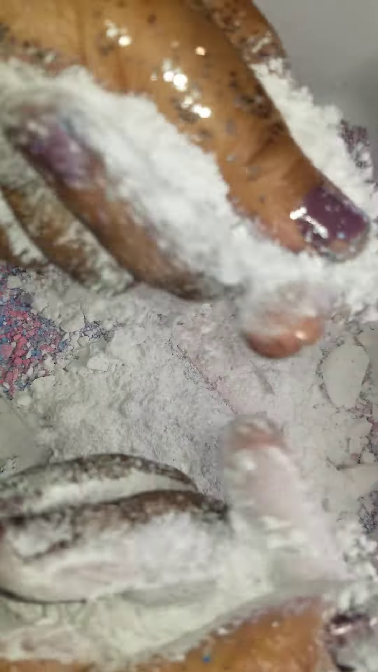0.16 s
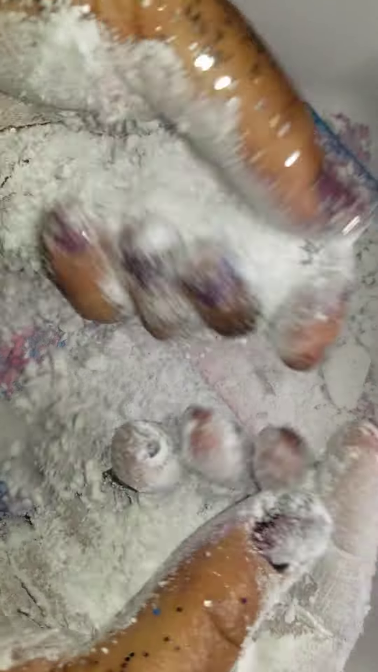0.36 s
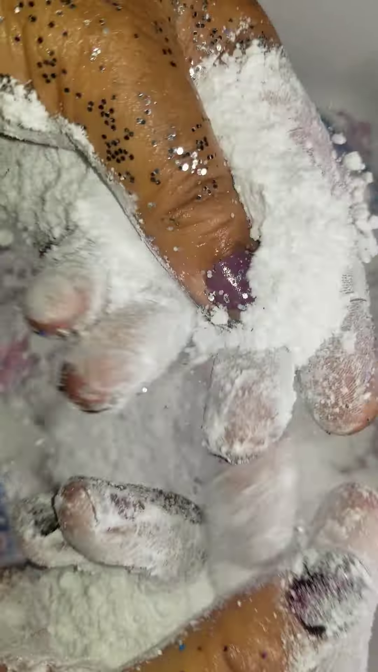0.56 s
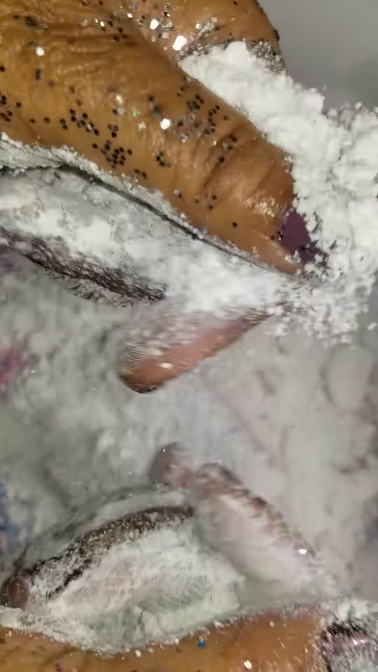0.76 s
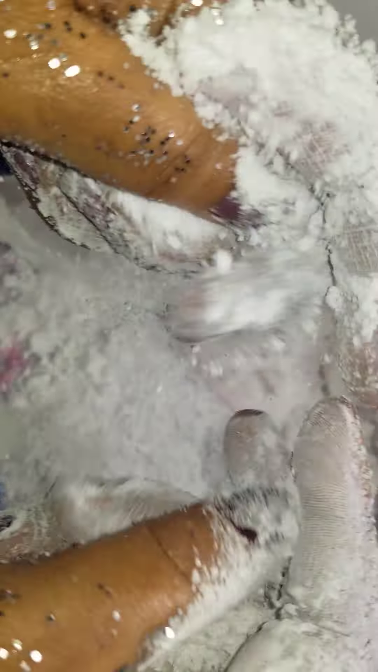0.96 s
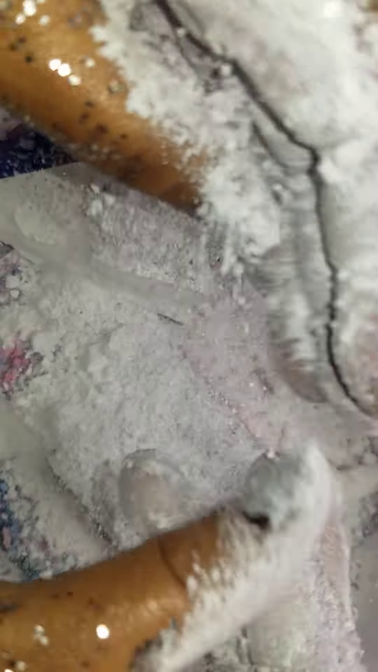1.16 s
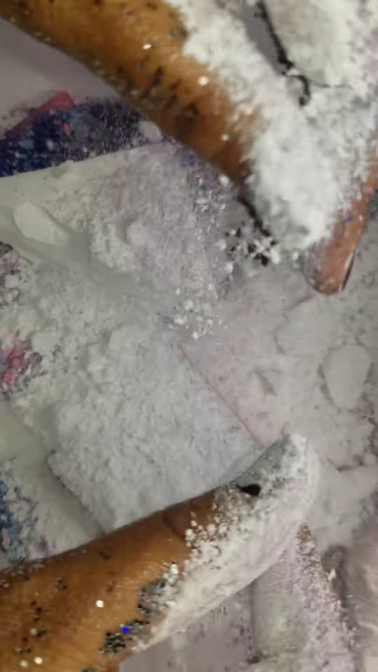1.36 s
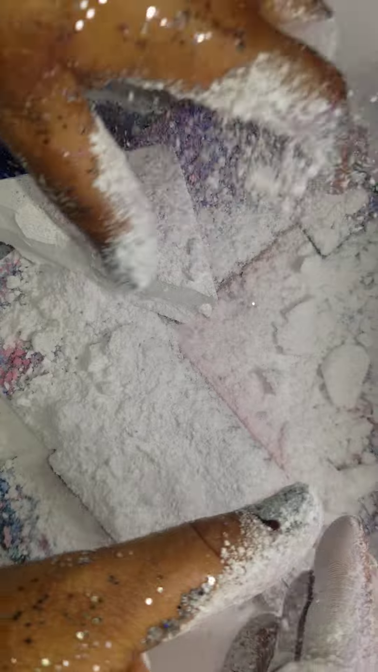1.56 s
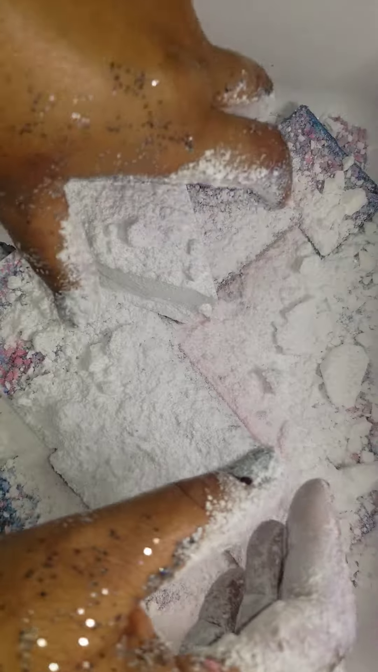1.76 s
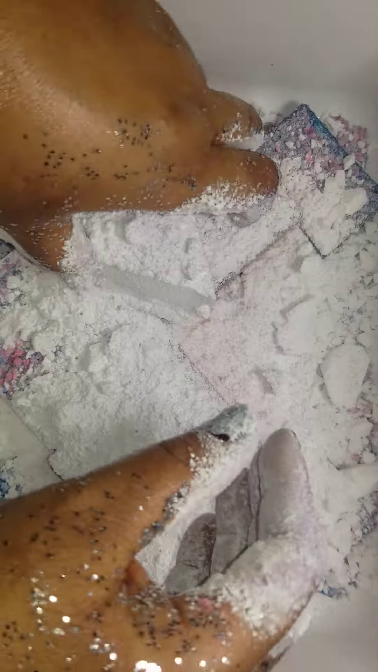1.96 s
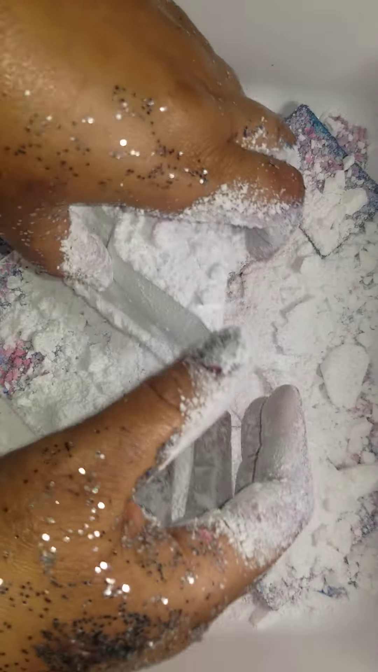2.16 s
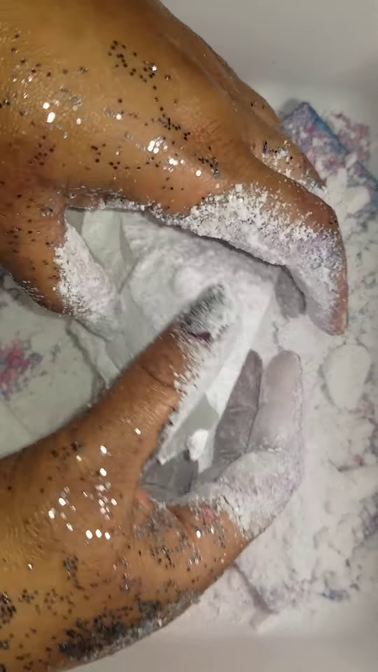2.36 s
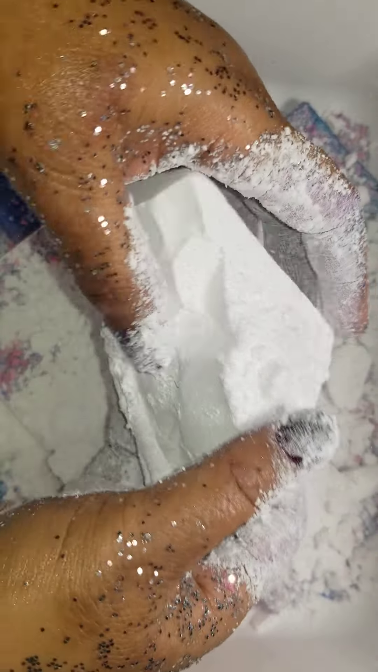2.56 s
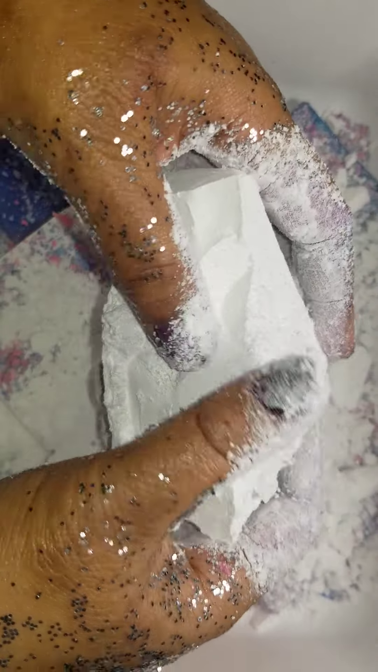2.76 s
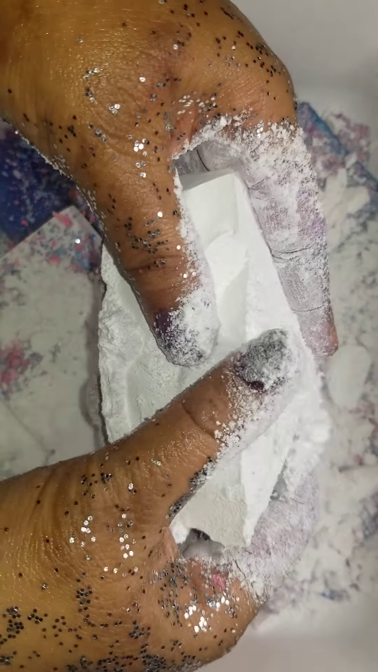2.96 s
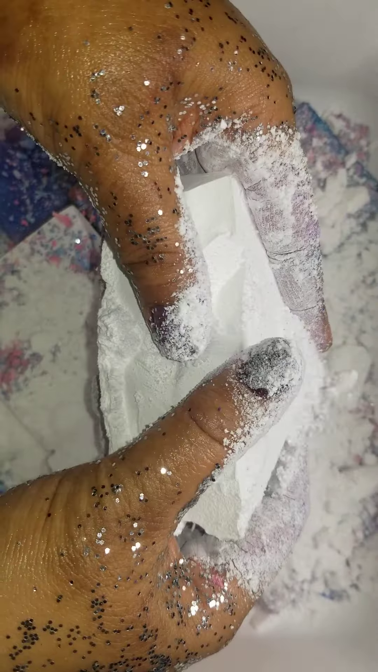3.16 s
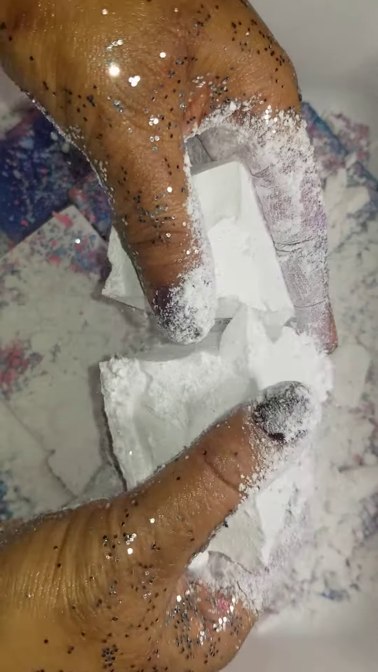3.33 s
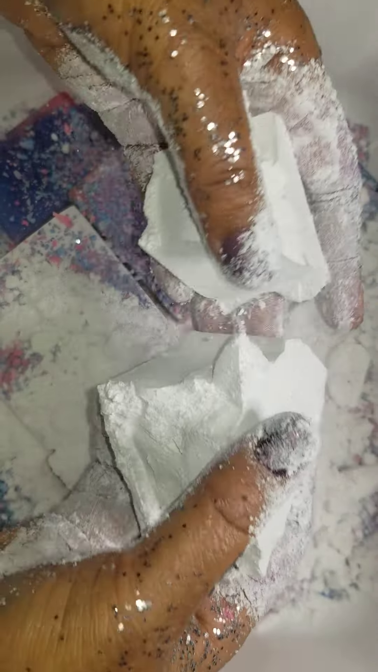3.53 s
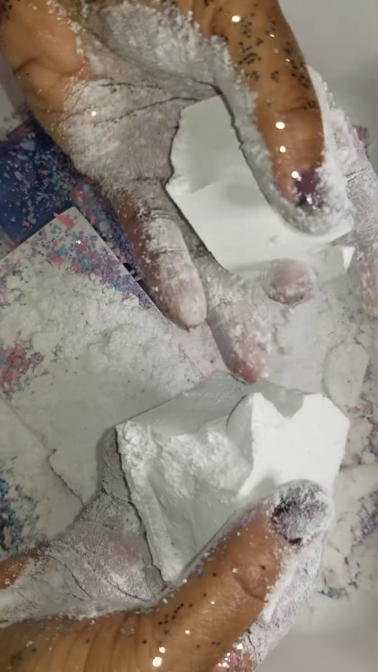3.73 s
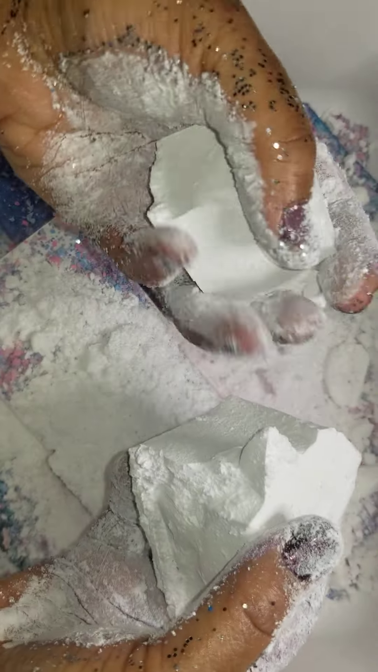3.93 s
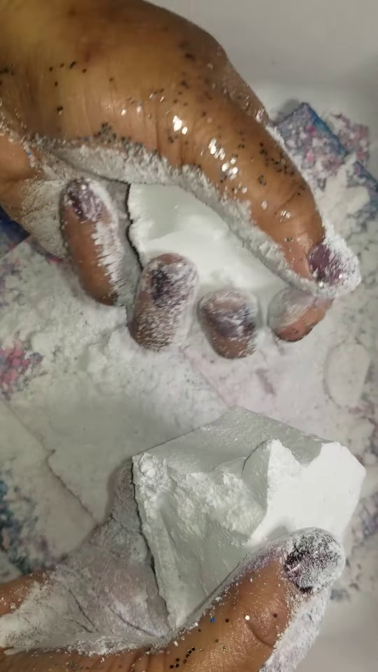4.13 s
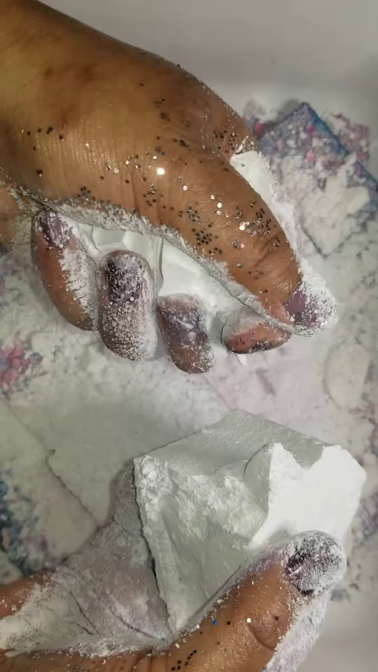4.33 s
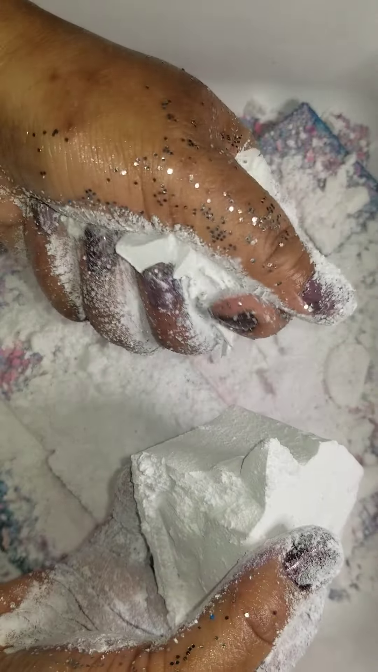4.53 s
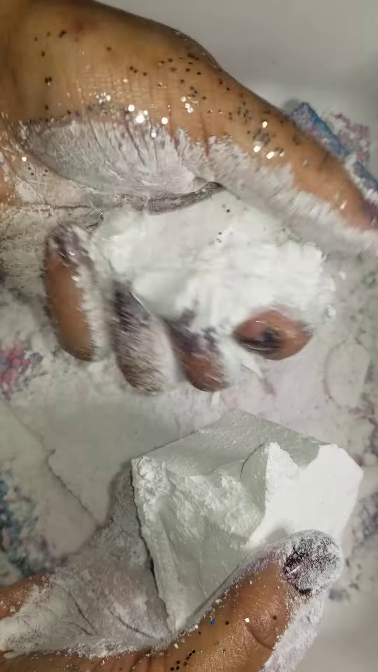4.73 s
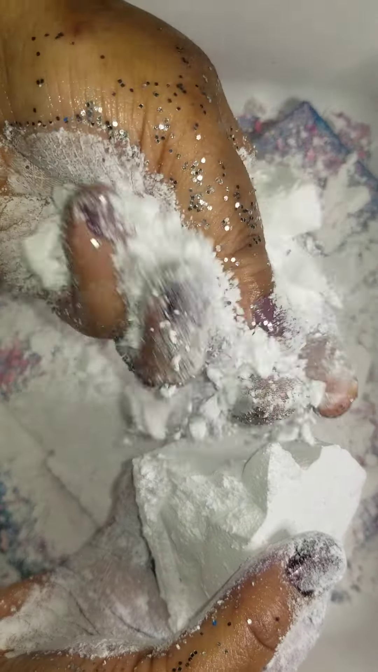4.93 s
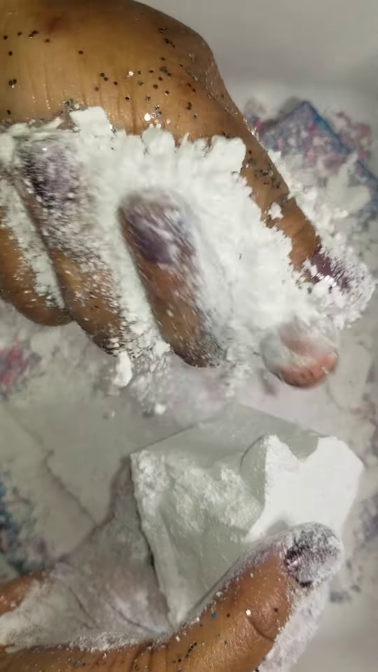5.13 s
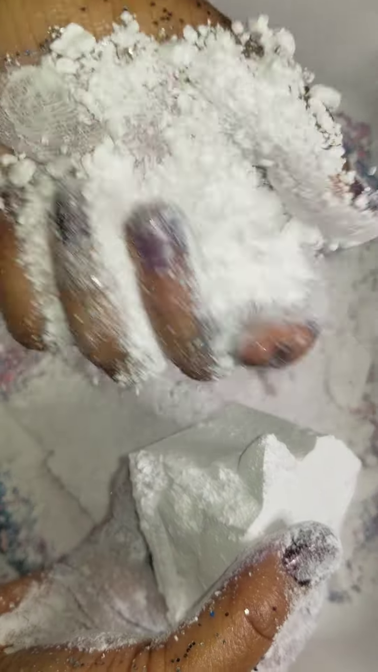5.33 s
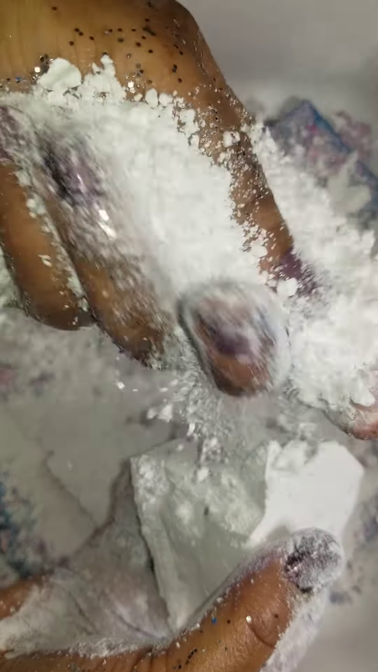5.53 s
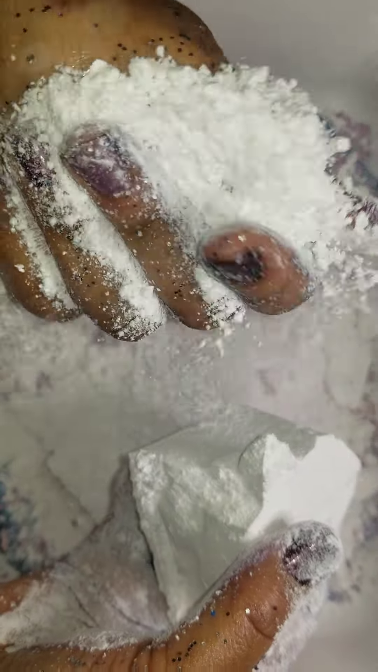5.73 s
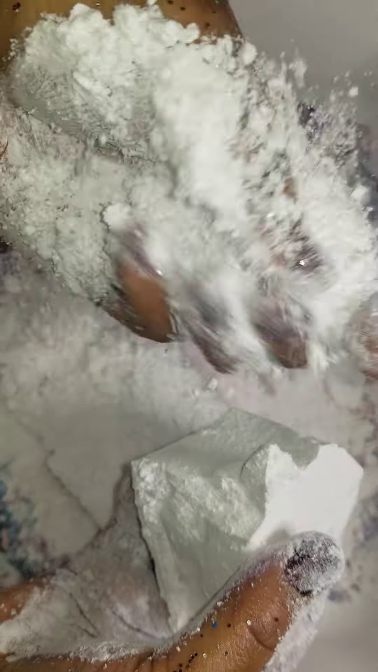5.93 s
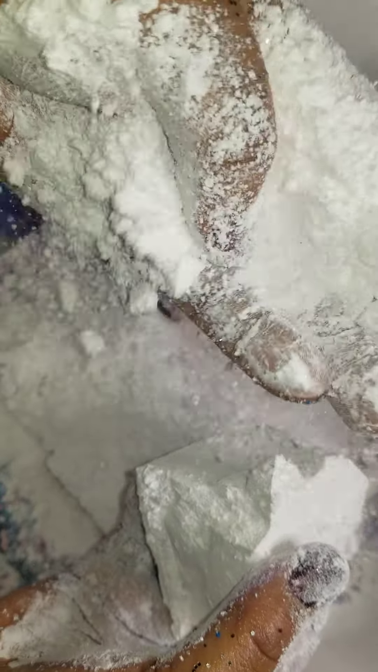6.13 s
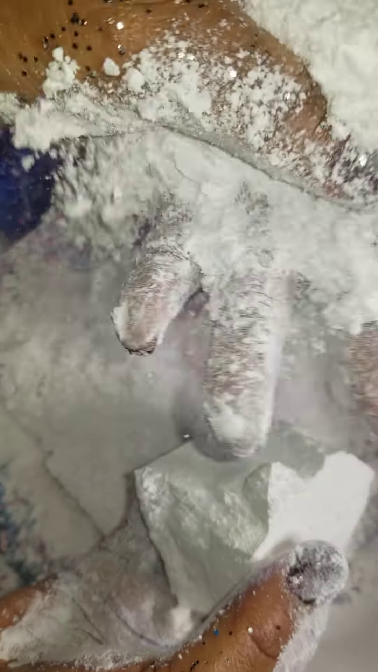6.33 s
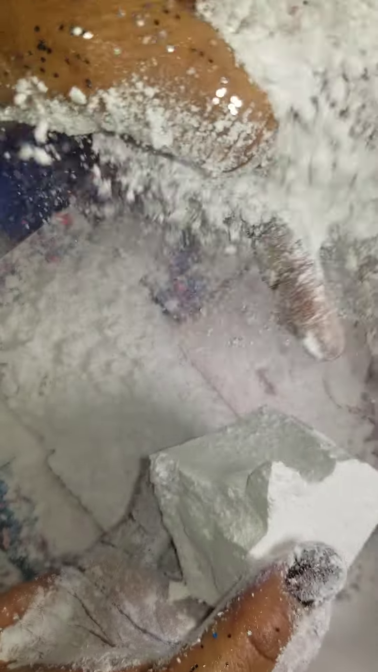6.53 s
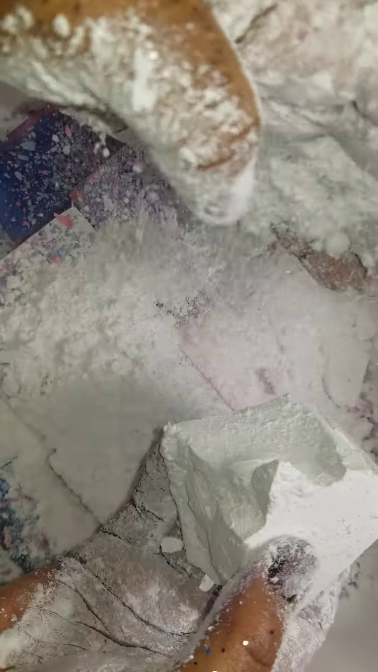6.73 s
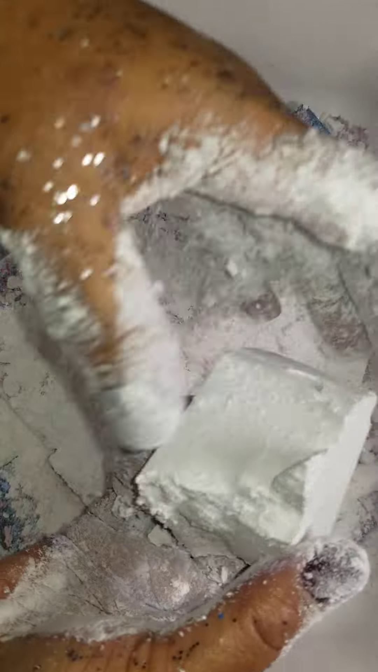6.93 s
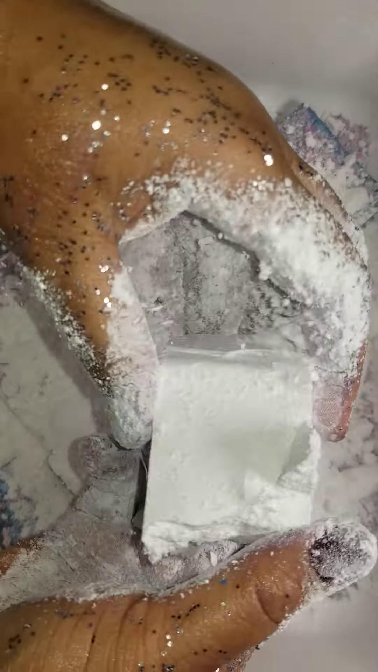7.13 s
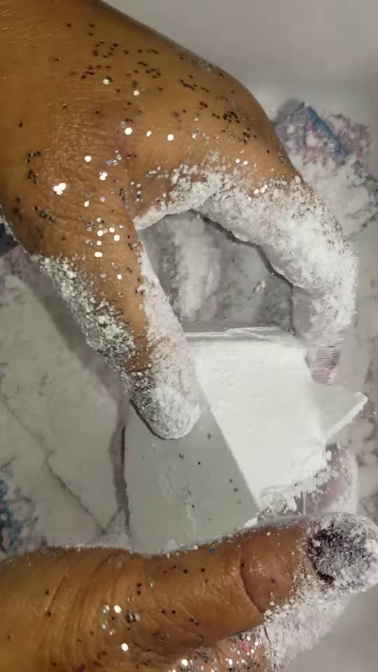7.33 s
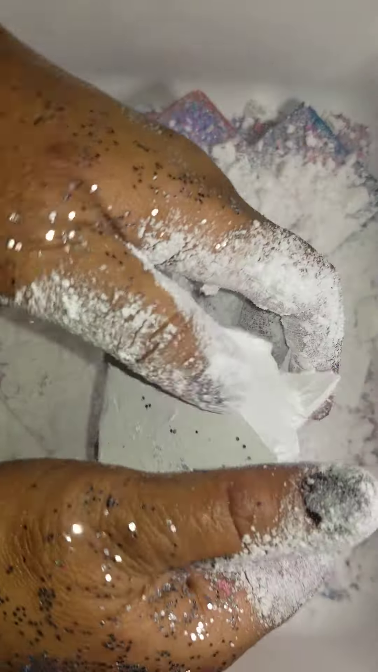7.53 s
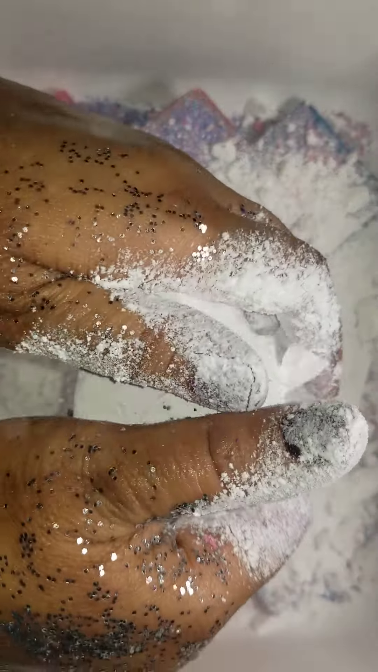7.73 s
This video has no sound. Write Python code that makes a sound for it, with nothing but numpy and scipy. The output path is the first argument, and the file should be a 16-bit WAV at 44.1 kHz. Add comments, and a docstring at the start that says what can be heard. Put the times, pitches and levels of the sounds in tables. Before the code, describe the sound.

Dry chalk breaks and crumbles in dusty hands: soft powdery rustling, sudden hollow snaps, crunching squeezes, and papery rubbing over a quiet low hum.

```python
"""A quiet room with a low hum; close to the microphone, hands break blocks of gym chalk over a plastic tub.
A block snaps: a sharp break excites the ring of the piece, noise bursts make its rattle, splinters and debris.
Lumps crumble in the fist and powder sifts down, both made of clumped random clicks over smooth noise.
Dusty skin rubs over a block, as coloured noise with a gliding hollow resonance.
Now and then the hands bump softly (decaying low tones) or a lump knocks on the tub (ringing noise)."""
import sys
import numpy as np
from scipy import signal
from scipy.fft import rfft, irfft, next_fast_len
from scipy.io import wavfile

SR = 44100
rng = np.random.default_rng(int(sys.argv[2]) if len(sys.argv) > 2 else 0)


def transcribe(u):
    """Save the signal u as a 16-bit wav file named by the first command-line argument.

    u: samples, shape (n,) or (channels, n), limited to [-1, 1]; the rate is SR.
    q: integer samples, one column per channel.
    """
    v = np.clip(np.atleast_2d(u).T, -1, 1)
    q = np.round(v * 32767).astype(np.int16)
    wavfile.write(sys.argv[1], SR, q)


N = 347948   # length [samples]
TIME = np.arange(N) / SR


def from_db(db):
    """Decibels to an amplitude factor."""
    return 10 ** (np.asarray(db) / 20)


def rms_one(x):
    """Scale a signal to rms 1."""
    return x / np.sqrt(np.mean(x ** 2) + 1e-20)


def in_time(rows):
    """Join the rows of a curve by straight lines."""
    s, *columns = np.transpose(rows)
    return [np.interp(TIME, s, c) for c in columns]


def add(out, s, sound):
    """Mix a short sound in at time s."""
    at = max(round(s * SR), 0)
    out[at:at + len(sound)] += sound[:max(N - at, 0)]


def colour(x, spectrum):
    """Give a flat signal a spectrum, joined over log frequency; rms 1."""
    hz, db = np.transpose(spectrum)
    size = next_fast_len(N)
    bins = np.maximum(np.fft.rfftfreq(size, 1 / SR), 1)
    gain = from_db(np.interp(np.log(bins), np.log(hz), db))
    return rms_one(irfft(rfft(x, size) * gain, size)[:N])


def band(x, low_hz, high_hz, order=2):
    """Causal band-pass."""
    edges = [low_hz, min(high_hz, .45 * SR)]
    return signal.sosfilt(signal.butter(order, edges, "band", fs=SR, output="sos"), x)


def resonate(x, hz, width_hz):
    """One resonance with gain 1 on top."""
    r = np.exp(-np.pi * width_hz / SR)
    zeros = np.array([1, 0, -1]) * (1 - r * r) / 2
    poles = [1, -2 * r * np.cos(2 * np.pi * hz / SR), r * r]
    return signal.lfilter(zeros, poles, x)


def dying(t, t60):
    """Exponential decay, 60 dB in t60 seconds."""
    return np.exp(-np.log(1000) * t / t60)


def drift(rate):
    """Smooth chance of rms 1 that heads for a new random value `rate` times a second."""
    return rms_one(np.interp(TIME * rate, np.arange(8000), rng.standard_normal(8000)))


def strokes(rows, rise_db_per_s, fall_db_per_s, sag_db_per_s=0):
    """Rows of (start, hold, dB, ..) swell up to the start, hold or sag, and fade; one gain per dB column."""
    power = np.zeros((len(rows[0]) - 2, N))
    for s, hold, *levels in rows:
        t = np.arange(max(-s, -60 / rise_db_per_s), hold + 60 / fall_db_per_s, 1 / SR)
        rise = rise_db_per_s * np.minimum(t, 0)
        sag = sag_db_per_s * np.clip(t, 0, hold)
        fall = fall_db_per_s * np.maximum(t - hold, 0)
        shape = from_db(rise - sag - fall)
        for layer, db in zip(power, levels):
            add(layer, s + t[0], (from_db(db) * shape) ** 2)
    return np.sqrt(power)


# Swells of the low hum in the room: (full from [s], hold [s], tone amplitude [dB])
HUM_SWELLS = [(5.1, 6.3, -57), (5.9, 0.28, -42), (6.65, 0.9, -43.5)]
# Spectrum of the quiet room: (frequency [Hz], relative density [dB])
ROOM_TONE_SPECTRUM = [(20, -8.5), (45, -0.5), (62, 6), (100, -10.5), (145, -5.5), (250, -13), (500, -19),
                      (1000, -22), (3000, -30), (8000, -35.5), (16000, -40)]


def background():
    """The empty room: coloured noise, a faint steady tone and a slightly unsteady low hum that swells."""
    swell, = strokes(HUM_SWELLS, rise_db_per_s=36.5, fall_db_per_s=62)
    hum_hz = 59.3 + .5 * drift(0.8)
    phase = 2 * np.pi * np.cumsum(hum_hz) / SR
    rumble = from_db(-13.5) * rms_one(band(rng.standard_normal(N), 35, 110))
    hum = swell * (np.sin(phase) + rumble)
    tone = from_db(-70.5) * np.sin(2 * np.pi * 143 * TIME)
    room_tone = from_db(-65) * colour(rng.standard_normal(N), ROOM_TONE_SPECTRUM)
    return hum + tone + room_tone


def room(x, wet_db=-27.0, t60=.22):
    """A short, faint tail from the tub and the room: the sound convolved with dying noise."""
    t = np.arange(SR // 2) / SR
    tail = band(rng.standard_normal(len(t)), 120, 10000, order=1)
    tail = tail * dying(t, t60) * (t > .004)
    tail = tail / np.sqrt(np.sum(tail ** 2))
    return x + from_db(wet_db) * signal.fftconvolve(x, tail)[:N]


# Soft bumps of the hands: (time [s], tone amplitude before rise and decay [dB], pitch [Hz], t60 [s])
HAND_BUMPS = [(0.218, -41.5, 85, 0.25), (1.234, -45.5, 91, 0.17), (1.944, -38.5, 87.5, 0.37),
              (2.43, -50, 63, 0.33), (3.236, -30.5, 76, 0.23), (4.865, -35, 165, 0.16),
              (5.161, -31.5, 87, 0.46), (5.205, -24, 190.3, 0.16), (7.85, -20, 140, 0.037)]
# A lump knocks on the tub: (time [s], rms before decay [dB], pitch [Hz], t60 [s])
TUB_KNOCKS = [(1.510, -43, 700, 0.067), (1.548, -56, 670, 0.17)]


def bumps(rise_s=.006):
    """Hands bump as dying low tones with some noise; the tub's wall knocks as dying resonant noise."""
    out, t = np.zeros(N), np.arange(SR // 2) / SR
    for s, db, hz, t60 in HAND_BUMPS:
        noise = rms_one(band(rng.standard_normal(len(t)), 35, 200))
        flesh = np.sin(2 * np.pi * hz * t) + 0.36 * noise
        add(out, s, from_db(db) * flesh * dying(t, t60) * (1 - np.exp(-t / rise_s)))
    for s, db, hz, t60 in TUB_KNOCKS:
        wall = rms_one(resonate(rng.standard_normal(len(t)), hz, width_hz=89))
        add(out, s, from_db(db) * wall * dying(t, t60))
    return out


# Early echoes from palm and tub: (delay [s], signed share [1])
PALM_ECHOES = [(.0006, 0.32), (.0013, -0.29), (.0024, .2)]


def palm(x, sway=0.1):
    """Palm and tub throw the sound back; the comb of resonances sways as the hands move."""
    echoes = np.zeros(N)
    for delay, share in PALM_ECHOES:
        swaying_delay = delay * (1 + sway * drift(2.4))
        echoes += share * np.interp(TIME - swaying_delay, TIME, x)
    return 0.99 * (x + echoes)


def grains(per_s, spread_db, clump_db, smooth):
    """Tiny collapses of uneven size that come in clumps, over a share of smooth friction."""
    sizes = from_db(spread_db * np.minimum(rng.exponential(1, N), 4)) * rng.choice([-1, 1], N)
    clicks = rms_one(sizes * (rng.random(N) < per_s / SR))
    return (clicks + smooth * rng.standard_normal(N)) * from_db(clump_db * drift(110))


def avalanches(per_s, size_db, spread_db, t60=.012):
    """Now and then a crumb gives way and takes its neighbours along: a gain that jumps and sinks."""
    sizes = from_db(size_db + spread_db * np.minimum(rng.exponential(1, N), 2.5))
    starts = sizes * (rng.random(N) < per_s / SR)
    return 1 + signal.fftconvolve(starts, dying(TIME[:2048], t60))[:N]


# Spectra of chalk under the hand, each scaled as a whole later: (frequency [Hz], relative density [dB])
# lumps inside the fist, loose grit, friction of dusty skin, fine powder
CRUNCH_SPECTRUM = [(100, 1.5), (200, 6.5), (450, -1), (650, -6), (950, 9), (1400, -20.5), (2500, -42)]
GRIT_SPECTRUM = [(500, -20), (1000, -7), (1400, -16), (1800, 4), (2600, 1), (3400, 2), (5000, -8.5),
                 (12000, -39)]
FRICTION_SPECTRUM = [(2400, -20.5), (3300, -10.5), (4000, 1.5), (5100, -1), (6000, -1), (7000, -3.5),
                     (8500, -8.5), (16000, -34)]
POWDER_SPECTRUM = [(4000, -24.5), (6500, -6.5), (8500, 1), (11000, -1), (14000, -0.5), (16500, -7.5)]


def crumbling(gains, spread_db, clumps):
    """Lumps collapse in clumps: dull inside the fist, brighter where loose grit grinds and dust sifts."""
    crunch, grit, friction, dust = gains
    inside = crunch * colour(grains(1800, spread_db, 2.0, 0.38) * clumps, CRUNCH_SPECTRUM)
    loose = grit * colour(grains(1400, spread_db, 1.5, .5) * clumps, GRIT_SPECTRUM)
    scratch = friction * colour(grains(2500, spread_db, 0.74, 0.8) * clumps, FRICTION_SPECTRUM)
    fine = dust * colour(grains(6000, spread_db, 0.94, .7) * np.sqrt(clumps), POWDER_SPECTRUM)
    return inside + loose + scratch + fine


def crumbs(gains, crumb_db, per_s, sharpness=5.0, count=14):
    """Single crumbs pop at random, at pitches for `count` sizes; their level follows the lumps around them."""
    crunch, grit, friction, dust = gains
    out = np.zeros(N)
    for hz in np.geomspace(420, 7500, count):
        pops = np.zeros(N)
        at = rng.integers(0, N, max(int(per_s / count * N / SR), 1))
        sizes = from_db(4 * np.minimum(rng.exponential(1, len(at)), 2.5))
        pops[at] = sizes * rng.choice([-1, 1], len(at))
        ringing = rms_one(resonate(pops + 1e-18, hz, hz / sharpness))
        gain = crunch if hz < 1200 else grit if hz < 3400 else friction
        out += ringing * gain
    return from_db(crumb_db) * out


# Skin slides on a whole block, levels before the palm's echoes:
# (full from [s], hold [s], friction [dB], hollow [dB], fine dust [dB], hollow's resonance [Hz])
# the friction level is that of the skin noise with its bounce and block resonance
BLOCK_RUBS = [(1.935, 0.036, -53, -64.5, -77, 2350), (2.208, .06, -76, -76.5, -75, 2330),
              (2.367, 0.074, -63, -73, -62, 2320), (2.472, .13, -73, -79, -68.5, 2400),
              (2.647, 0.025, -63.5, -72, -60.5, 2493), (2.694, 0.13, -55.5, -63.5, -58, 2450),
              (2.85, 0.034, -64.5, -68.5, -64, 2550), (3.39, .05, -61.5, -67.5, -68, 2830),
              (3.475, 0.013, -52, -63, -55.5, 2890), (3.54, 0.059, -59.5, -75.5, -59.5, 3000),
              (3.701, .035, -46.5, -72, -51, 2600), (3.824, 0.01, -57, -65.5, -56.5, 2760),
              (3.871, .04, -67, -79, -66, 2800), (3.97, .1, -59.5, -74, -59.5, 2650),
              (4.109, .025, -70, -64.5, -62, 2500), (7.07, .04, -58, -75, -60, 3600),
              (7.138, 0.073, -52, -68, -59, 3570), (7.216, 0.037, -56, -57.5, -49, 3090),
              (7.343, 0.026, -59, -72, -55, 3000), (7.395, 0.0306, -69, -84, -73, 3040),
              (7.53, 0.094, -54.5, -58, -60.5, 2760), (7.686, 0.039, -67, -71, -73, 2450)]


def rubbing(width_hz=290.0, block_hz=5160.0, block_width_hz=470.0, block_db=0.5, wander=0.063):
    """Dusty skin slides on a block; the hollow under the hand rings at a pitch that glides between grips."""
    levels = [row[:-1] for row in BLOCK_RUBS]
    friction, hollow, dust = strokes(levels, rise_db_per_s=417, fall_db_per_s=380.)
    hz, = in_time([(s + length / 2, pitch) for s, length, *_, pitch in BLOCK_RUBS])
    hz = hz * (1 + wander * drift(16))   # the grip is never quite steady
    # slow noise on a sine and a cosine: a narrow noise band around the gliding pitch
    low_pass = signal.butter(2, width_hz, fs=SR, output="sos")
    narrow = signal.sosfilt(low_pass, rng.standard_normal((2, N)))
    phase = 2 * np.pi * np.cumsum(hz) / SR
    cavity = hollow * rms_one(narrow[0] * np.cos(phase) + narrow[1] * np.sin(phase))
    skin = colour(grains(8200, 6.8, 1.7, 0.83), FRICTION_SPECTRUM)
    bounced = .35 * np.interp(TIME - 1.1 / hz, TIME, skin)   # adds the hollow's higher resonances
    block = from_db(block_db) * resonate(skin, block_hz, block_width_hz)
    skin = rms_one(skin + bounced + block)
    fine = dust * colour(grains(8000, 3.4, 0.61, 0.83), POWDER_SPECTRUM)
    return palm(cavity + friction * skin + fine)


# Powder worked between open fingers, before the layer gains and the palm's echoes:
# (full from [s], hold [s], friction [dB], lumps [dB], fine dust [dB])
POWDER_SIFTS = [(.02, .15, -60.5, -63, -66), (.2, .2, -59, -54.5, -54.5), (.47, .11, -64, -70.5, -69),
                (.635, .045, -55.5, -73, -48.5), (.72, .06, -63, -68.5, -61), (.82, .17, -52, -54.5, -51.5),
                (1.04, .05, -58.5, -59.5, -55), (1.115, .02, -59, -85, -49.5),
                (1.18, .1, -50, -63.5, -55.5), (1.32, .055, -53.5, -59.5, -50),
                (5.145, .09, -64.5, -62.5, -54), (6.495, .09, -57.5, -59.5, -62),
                (6.62, .11, -57.5, -56, -65), (6.76, .04, -55.5, -57.5, -62), (6.915, .06, -62, -64.5, -66)]


def sifting(crunch_db=-7.5, grit_db=-3.0):
    """Open fingers work loose powder: mostly friction and dust, with a few soft lumps."""
    friction, lumps, dust = strokes(POWDER_SIFTS, rise_db_per_s=454, fall_db_per_s=346)
    gains = lumps * from_db(crunch_db), lumps * from_db(grit_db), friction, dust
    clumps = avalanches(per_s=60, size_db=-7.5, spread_db=7.5)
    powder = palm(crumbling(gains, spread_db=3.8, clumps=clumps))
    return powder + crumbs(gains, crumb_db=-8.5, per_s=420)


# The fist closes on lumps, before the layer gains and the palm's echoes:
# (full from [s], hold [s], level at that time [dB], muffled crunch above that level [dB])
FIST_SQUEEZES = [(0.299, 0.13, -57.5, 2.5), (3.18, 0.043, -70, -2), (3.228, 0.076, -56, 3),
                 (4.254, 0.2, -53.5, -7.5), (4.494, 0.2, -67, -5), (4.754, 0.28, -68, -2),
                 (4.924, .19, -59.5, 9.5), (5.161, .14, -57, 10), (5.307, 0.18, -63.5, 3.5),
                 (5.509, 0.15, -59.5, 2), (5.71, 0.16, -57, 0), (5.882, 0.19, -65.5, -3.5),
                 (6.209, 0.18, -65, -5)]


def squeezing(friction_db=-1.5, dust_db=-9.5):
    """The fist closes: lumps give way in sharp clumps, loudest at the start of each squeeze."""
    rows = [(s, length, db, db + muffled) for s, length, db, muffled in FIST_SQUEEZES]
    # the sag: crumbling dies down as the lumps give way
    force, crunch = strokes(rows, rise_db_per_s=899, fall_db_per_s=250., sag_db_per_s=25)
    gains = crunch, force, force * from_db(friction_db), force * from_db(dust_db)
    clumps = avalanches(per_s=65, size_db=1., spread_db=3.)
    lumps = palm(crumbling(gains, spread_db=4.5, clumps=clumps))
    return lumps + crumbs(gains, crumb_db=-6., per_s=240)


# The loudest fractures, close to the microphone; each level is the layer's energy as rms over 10 ms:
# (time [s], thud [dB], ring [dB], crack [dB], ring pitch [Hz])
CHALK_FRACTURES = [(0.2339, -60, -59, -57, 1936), (.309, -47.5, -55, -52, 1710),
                   (.3334, -43, -42.5, -44.5, 1820), (.3844, -59, -45.5, -55, 2630),
                   (0.4057, -61, -48, -57, 3700), (.438, -66, -45.5, -43.5, 3216),
                   (.7196, -75, -53.5, -64, 2860), (.856, -68, -49.5, -61, 2800),
                   (.903, -57.5, -50, -58, 2000), (.9721, -74, -40.5, -66, 1790),
                   (1.1692, -65, -70, -46, 3700), (1.186, -74, -68, -45, 3830),
                   (1.219, -67, -63, -42.5, 3297), (1.2573, -74, -48.5, -44.5, 3520),
                   (1.2736, -62.5, -45, -46, 3660), (1.403, -59, -60, -71, 830),
                   (1.5035, -76, -61, -76, 920), (1.663, -71, -71, -63.5, 2980),
                   (2.7698, -67, -51.5, -51, 3283), (3.138, -72, -62, -72, 2300),
                   (3.166, -57.5, -60.5, -71, 2060), (3.2245, -36.5, -31, -48, 764),
                   (3.2278, -22.5, -36.5, -26.5, 1560), (3.2435, -55, -36.5, -44, 2630),
                   (3.3434, -51, -42, -52.5, 2520), (3.589, -66, -60.5, -71, 1260),
                   (3.779, -70, -55, -59, 1185), (3.9504, -67.5, -59, -47, 3920),
                   (4.2308, -70.5, -65.5, -51.5, 2703), (4.2453, -42.5, -40, -39.5, 2690),
                   (4.251, -33.5, -29.5, -39.5, 2483), (4.2545, -51.5, -33.5, -43.5, 2600),
                   (4.2783, -34.5, -14, -25, 1770), (4.2909, -49.5, -41.5, -42, 1915),
                   (4.343, -48.5, -44, -51, 2297), (4.3469, -43.5, -41.5, -45, 2370),
                   (4.354, -51, -43, -49, 2550), (4.3997, -64, -54, -54, 2120),
                   (4.4136, -67, -47, -52.5, 2080), (4.423, -71, -42, -54, 2100),
                   (4.4342, -71, -47, -54, 3300), (4.468, -85, -47, -40, 2350),
                   (4.491, -51.5, -47, -48, 1920), (4.6185, -57, -51.5, -59, 2010),
                   (4.6478, -56.5, -43.5, -62, 2320), (4.8597, -40.5, -66, -64, 790),
                   (4.9211, -54, -52, -70, 2820), (4.9353, -52.5, -42.5, -58, 1815),
                   (4.942, -65, -48, -66, 1416), (4.957, -38, -41, -55, 1262),
                   (4.9717, -37, -40.5, -55, 938), (5.0542, -40, -47.5, -52.5, 972),
                   (5.091, -44, -45, -50, 1108), (5.1365, -36, -50.5, -38, 1755),
                   (5.173, -35.5, -38.5, -49, 814), (5.1965, -40.5, -45, -49.5, 1147),
                   (5.2166, -17.5, -12.5, -38.5, 915), (5.2376, -32, -31, -51, 761),
                   (5.2578, -45, -41.5, -55.5, 1620), (5.2968, -40.5, -41, -56, 1100),
                   (5.3896, -50, -75, -50.5, 724), (5.4538, -58, -44.5, -41, 3330),
                   (5.5104, -55, -42, -45, 3346), (5.552, -65, -45.5, -59, 3020),
                   (5.5752, -54.5, -44, -64, 2450), (5.6096, -54, -35.5, -71, 3440),
                   (5.765, -52.5, -49.5, -58, 905), (5.813, -53, -36, -55, 2180),
                   (6.0166, -58, -57, -59.5, 3496), (6.215, -57, -66, -65.5, 864),
                   (6.2855, -59, -67, -55, 2770), (6.554, -57, -50.5, -72, 2870),
                   (6.6529, -77, -47, -70, 3300), (6.7114, -70, -44, -65, 3740),
                   (6.7235, -68, -49.5, -58.5, 3036), (6.925, -57, -66, -54, 2560),
                   (7.697, -61, -48.5, -53, 3800), (7.7889, -36, -41.5, -41.5, 1518),
                   (7.8531, -27.5, -22.5, -27.5, 1650), (7.877, -47, -37, -46, 3771),
                   (7.8833, -44, -34.5, -46, 3700)]


def level(x, db):
    """Scale a short sound so that its energy, spread over 10 ms, has this rms level."""
    return from_db(db) * x / np.sqrt(np.sum(x ** 2) / (SR / 100))


def fractures(width_hz=170.0, damping_slope=2.3, rattle_db=-2.5, rattle_t60=0.023, rattle_slope=.65,
              crack_t60=0.011, air_db=-18.5, thud_t60=0.036, debris_db=-18.5, debris_t60=0.078, rise_s=0.0006):
    """One main break, then a burst of tiny ones: the piece rings, splinters spit, the fist thuds, debris follows."""
    out, t = np.zeros(N), np.arange(6144) / SR
    main = 1. * (t == 0)
    for s, thud, ring, crack, hz in CHALK_FRACTURES:
        uneven = from_db(5.4 * rng.standard_normal((3, len(t))))
        breaks = rng.standard_normal((3, len(t))) * uneven * (1 - np.exp(-t / rise_s))

        t60 = rattle_t60 * (1000 / hz) ** rattle_slope   # big pieces go on rattling longer
        width = min(width_hz * (hz / 1000) ** damping_slope, 0.17 * hz)   # small pieces ring high and die at once
        rattle = resonate(breaks[0] * dying(t, t60), hz, 2 * width)
        piece = level(resonate(main, hz, width), 0) + level(rattle, rattle_db)
        top_hz = 1.9 * hz * (hz / 1000) ** 0.34   # big pieces break deep in the fist, muffled
        piece = band(piece, min(hz / 1.6, 1150), top_hz, order=4)

        splinters = band(breaks[1] * dying(t, crack_t60), 3300, 15000)
        edge = resonate(splinters, 5100, 1800) + from_db(air_db) * splinters

        push = 20 * main + breaks[2] * dying(t, thud_t60)   # the halves jerk apart
        fist = band(resonate(push, 430, 120) + 0.84 * resonate(push, 230, 170), 46, 620)

        # sparse chips shed by the fresh faces, 700 a second
        chips = rng.standard_normal(len(t)) * (rng.random(len(t)) < 700 / SR)
        debris = band(chips * dying(t, debris_t60), hz / 2.9, 1.9 * hz)

        add(out, s, level(piece, ring) + level(edge, crack))
        add(out, s, level(fist, thud) + level(debris, ring + debris_db))
    return out


def scene():
    """Chalk and hands over the tub, in a quiet room."""
    chalk = bumps() + rubbing() + sifting() + squeezing() + fractures()
    return (background() + room(chalk))[None]


def record(dry, cutoff_hz=16100):
    """The microphone signal: the highest peaks are rounded and a steep low-pass cuts the top."""
    low_pass = signal.ellip(10, .2, 80, cutoff_hz, fs=SR, output="sos")
    return signal.sosfilt(low_pass, np.tanh(dry))


dry = scene()
out = record(dry)
transcribe(out)
```